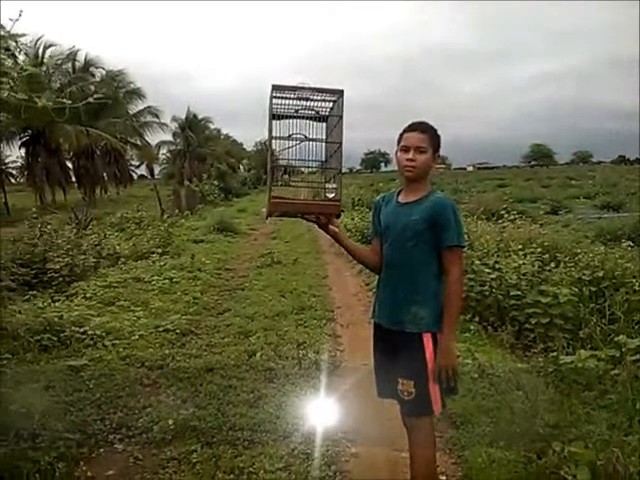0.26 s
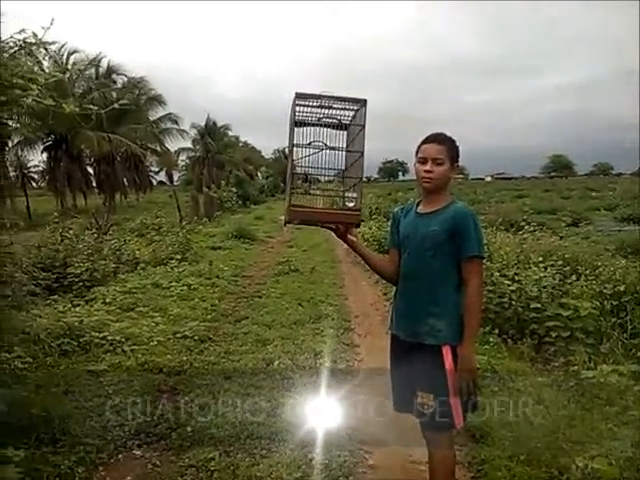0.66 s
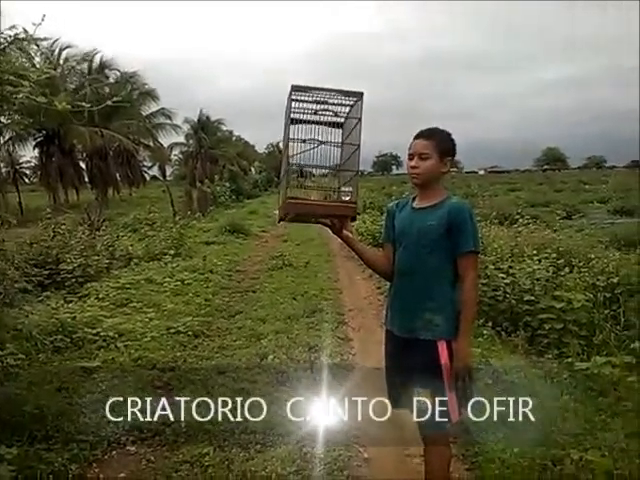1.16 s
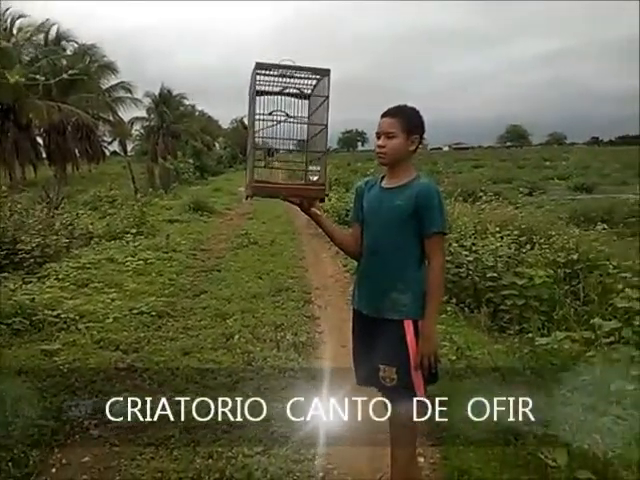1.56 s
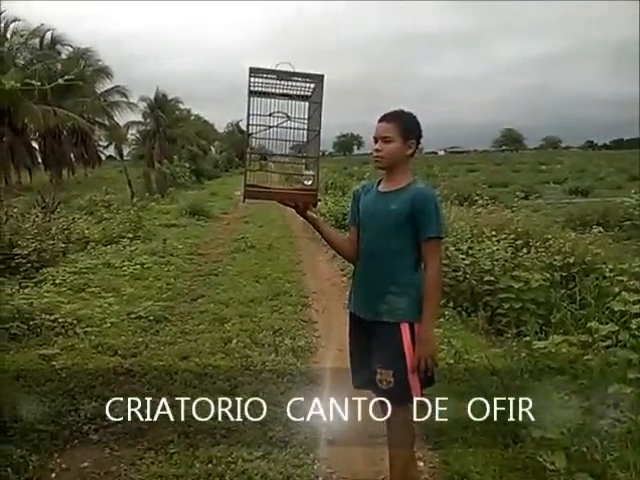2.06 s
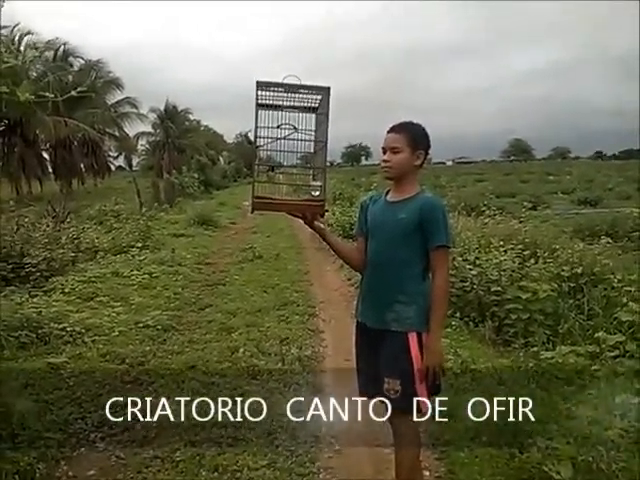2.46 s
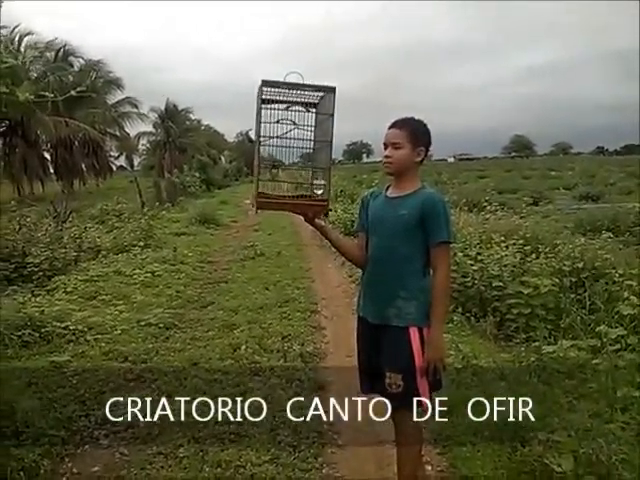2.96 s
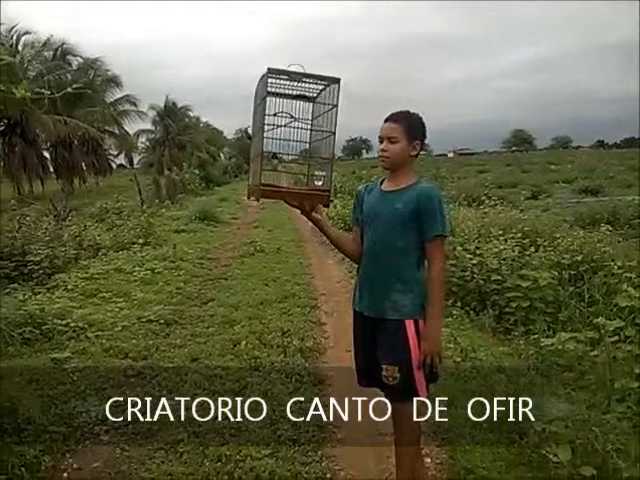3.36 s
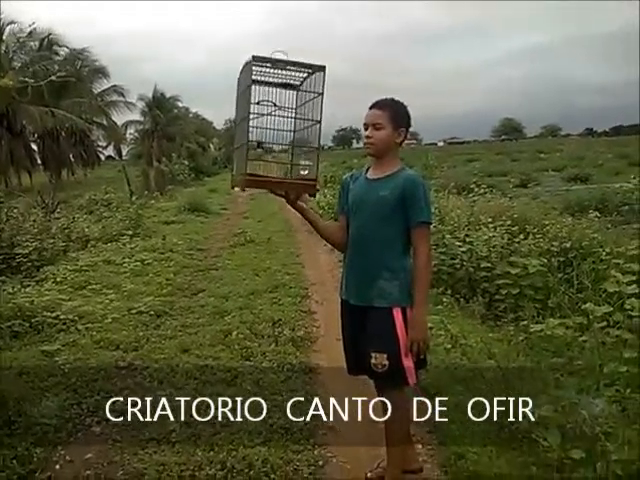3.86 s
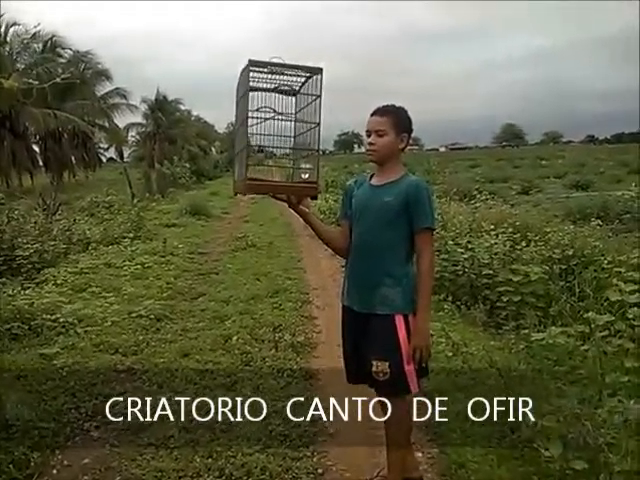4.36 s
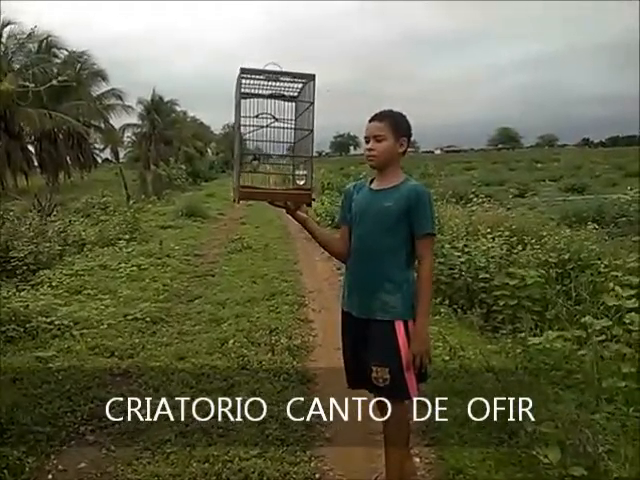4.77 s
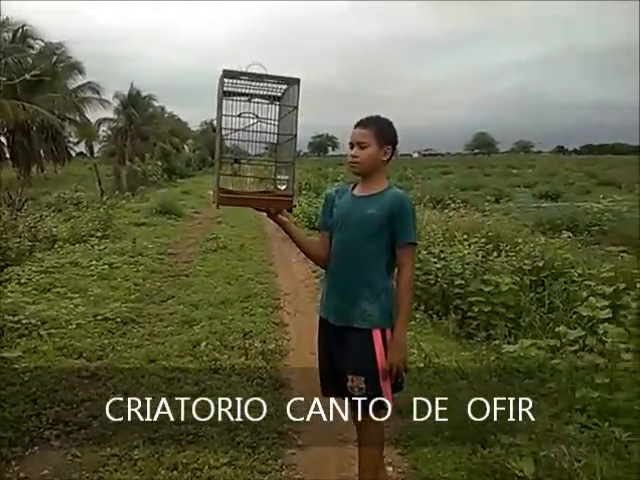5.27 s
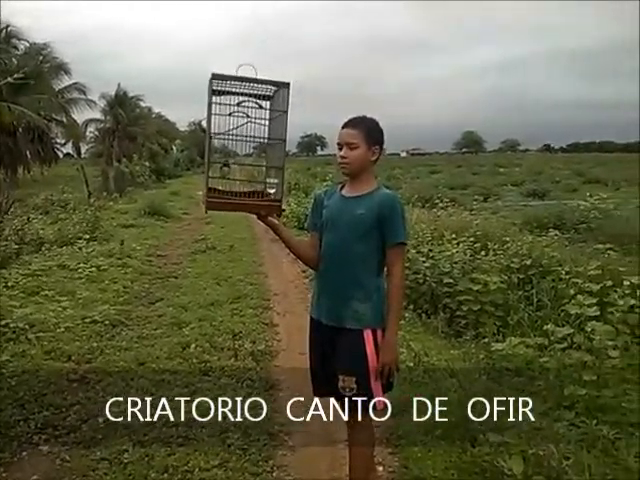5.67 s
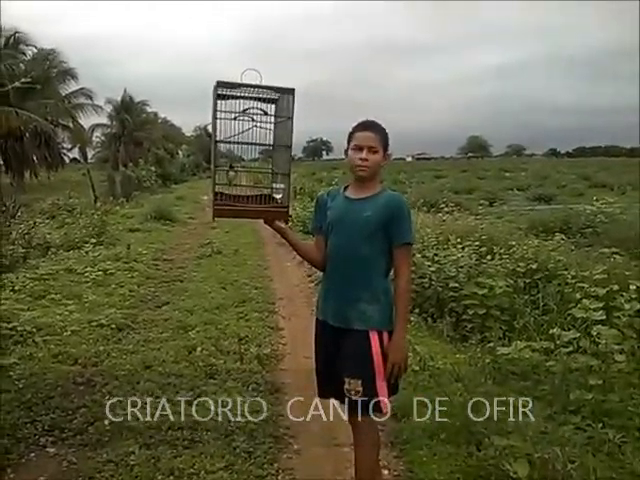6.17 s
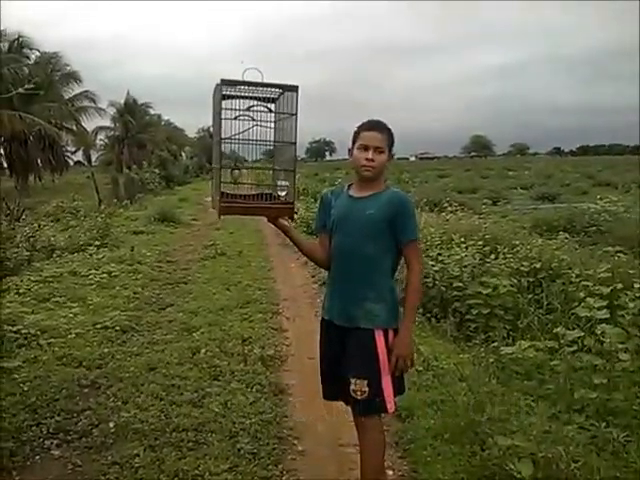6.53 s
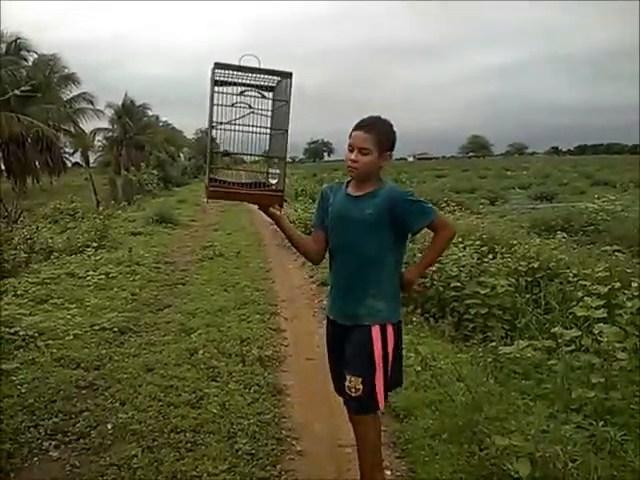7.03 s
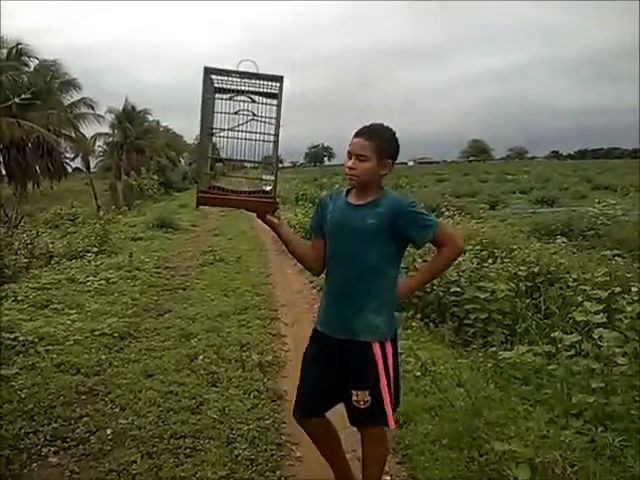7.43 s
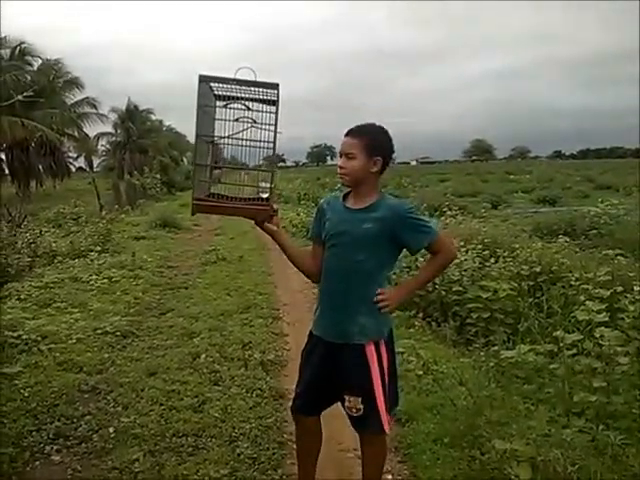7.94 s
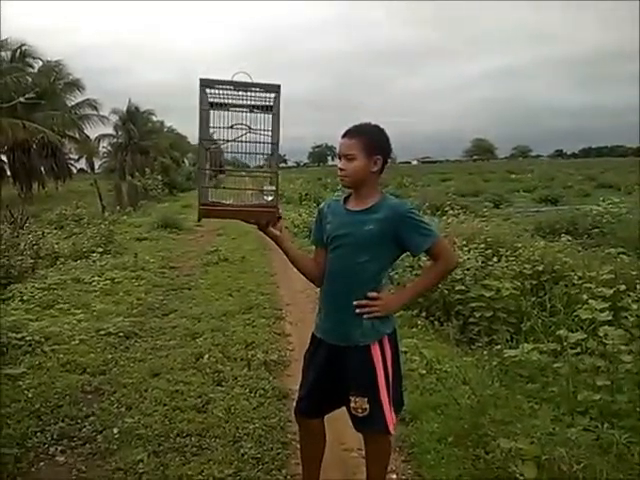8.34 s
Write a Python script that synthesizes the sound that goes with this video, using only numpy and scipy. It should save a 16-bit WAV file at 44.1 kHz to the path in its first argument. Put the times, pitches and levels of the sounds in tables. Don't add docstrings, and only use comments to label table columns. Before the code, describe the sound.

An open field with steady air hiss, a thin electronic whine, a faint low engine hum and high, rasping crickets; a katydid swishes softly during the first second. From 0.7 to 2.2 s a close caged bird whistles loudly: short falling slides, plunges, a scoop upward, then two steep high dives ending in hooks. A farther bird's buzzy chips quicken from 1.3 to 2.8 s. Insects then hold alone, with a few stray chirps. At 4.1-4.7 s the far bird gives six rough falling sweeps. Wind bumps and rumbles the microphone from about 4.7 to 6.6 s, and again around 7.5-8.4 s. At 6.8 s the near bird utters one short hoarse scold. Barely audible dove coos begin around 7 s. From 7.7 s distant trills slow and swell, and from 8 s the near song returns, diving and hooking down until about 9.5 s.

```python
import sys
import numpy as np
from scipy import signal
from scipy.fft import rfft, irfft, next_fast_len
from scipy.io import wavfile
from scipy.ndimage import map_coordinates

SR = 44100
rng = np.random.default_rng(int(sys.argv[2]) if len(sys.argv) > 2 else 0)


def volts(x):
    e = np.asarray(x, float) / 20
    return 10 ** e


def transcribe(u):
    v = np.clip(np.atleast_2d(u).T, -1, 1)
    q = np.round(v * 32767).astype(np.int16)
    wavfile.write(sys.argv[1], SR, q)


N = 418950
TIME = np.arange(N) / SR

# t from peak/s, pitch ratio, level/dB, shake depth/Hz
BUZZ_SHAPE = [(-.017, .9, -14, 500), (-.009, .93, -3, 800), (.005, 1.0, 0, 750), (.016, 1.11, -6, 350),
              (.032, 1.17, -13, 60)]
# t from peak/s, pitch ratio, level/dB, shake depth/Hz
DROP_SHAPE = [(-.02, 0.88, -29, 503), (-.008, 1.05, -9.5, 400), (.004, .98, -2, 200),
              (0.015, 0.88, -29, 100)]


def unit(x):
    return x / np.sqrt(np.mean(x ** 2) + 1e-20)


def wobble(rate_hz, size=N):
    knots = rng.standard_normal(int(size * rate_hz / SR) + 4)
    return map_coordinates(knots, [np.arange(size) * rate_hz / SR])


def noise(spectrum):
    hz = np.fft.rfftfreq(N, 1 / SR)
    f, db = np.transpose(spectrum)
    gain = volts(np.interp(np.log(hz + 1), np.log(f), db, -120, -120))
    return unit(irfft(rfft(rng.standard_normal(N)) * gain, N))


def track(rows, shake=np.zeros(N)):
    s, hz, db, *depth = np.transpose(rows)
    at = np.arange(max(round(s[0] * SR), 0), min(round(s[-1] * SR), N))
    t = at / SR
    edge = np.clip(np.minimum(t - s[0], s[-1] - t) / .003, 0, 1)
    swing_hz = shake[at] * (np.interp(t, s, depth[0]) if depth else 1)
    phase = 2 * np.pi * np.cumsum(np.interp(t, s, hz) + swing_hz) / SR
    level = np.sqrt(2) * edge * volts(np.interp(t, s, db))
    return at, phase + rng.uniform(0, 2 * np.pi), level


def syllables(events, shape, rate_hz, pitch_hz=None, stretch=0.):
    out = np.zeros(N)
    turn = 2 * np.pi * np.cumsum(rate_hz * (1 + 0.22 * wobble(60))) / SR
    shake = np.sin(turn) + 0.41 * wobble(500)
    for s, db, *own_hz in events:
        slow = 1 + stretch * (s - events[0][0]) ** 2
        hz = pitch_hz or own_hz[0]
        rows = [(s + dt * slow, hz * ratio ** slow ** .5, db + gain_db, depth_hz)
                for dt, ratio, gain_db, depth_hz in shape]
        at, phase, level = track(rows, shake)
        out[at] += level * np.sin(phase)
    return out


def strokes(rate_hz, duty, teeth):
    place = np.cumsum(rate_hz * (1 + 0.0039 * wobble(7.2))) / SR % 1
    swell = np.sin(np.pi * np.clip(place / duty, 0, 1)) ** 0.52
    return place, unit(swell * (1 + teeth * place * np.cos(8 * np.pi * place)))


def echoes(x, t60_s, wet_db, gap_s):
    t = np.arange(SR // 2) / SR
    tail = rng.standard_normal(len(t)) * volts(-60 * t / t60_s) * (t > gap_s)
    return x + volts(wet_db) * signal.fftconvolve(x, tail / np.linalg.norm(tail))[:N]


def bounced(x, db_per_octave):
    # delay/s, level at 2.5 kHz/dB
    bounces = [(.0031, -27), (.0075, -28.5), (.014, -31), (.022, -37), (.031, -41)]
    size = next_fast_len(N + SR // 10)
    hz = np.fft.rfftfreq(size, 1 / SR)
    copies = sum(volts(db) * np.exp(-2j * np.pi * hz * delay_s) for delay_s, db in bounces)
    tilt = volts(db_per_octave * (1.47 - abs(np.log2((hz + 1) / 7000))))
    return irfft(rfft(x, size) * (1 + copies * tilt), size)[:N]


def engine():
    # t/s, firing f/Hz, third-order level/dB
    running = [(0, 38.92, -66.5), (2.2, 39.16, -67.5), (5, 38.12, -57), (5.6, 35.24, -56),
               (6.5, 34.18, -55), (7.1, 31.8, -69.5), (7.999, 29.27, -62.5), (9, 37.55, -59)]
    s, hz, db = np.transpose(running)
    turn = 2 * np.pi * np.cumsum(np.interp(TIME, s, hz) * (1 + 0.0097 * wobble(26.0))) / SR
    orders = volts(-9.5) * np.sin(2 * turn) + np.sin(3 * turn) + volts(-3.0) * np.sin(4 * turn)
    return volts(2.5 + np.interp(TIME, s, db) + 2.1 * wobble(7.9)) * orders


def hiss():
    # f/Hz, level/dB per Hz
    air = [(35, -23.5), (60, -1), (129, -10.5), (369, -15), (2440, -17), (4160, -22.5), (5380, -15.5),
           (8370, -23.5), (15700, -22.5)]
    air_db, whine_hz, whine_db = -57, 15186, -80.5
    return volts(air_db) * noise(air) + volts(whine_db) * np.sin(2 * np.pi * whine_hz * TIME)


def wind():
    # f/Hz, level/dB per Hz
    rumble = [(15, -11), (28, -4.5), (60, -12.5), (150, -29), (400, -41.5)]
    # peak t/s, peak level/dB
    gusts = [(4.658, -40), (4.903, -38), (5.021, -34), (5.101, -44), (5.182, -32.5), (5.319, -27.5),
             (5.459, -31.5), (5.72, -35), (5.794, -34.5), (5.9, -31), (6.033, -36.5), (6.089, -36),
             (6.194, -35), (6.289, -30), (6.467, -31.5), (6.639, -38.5), (7.459, -38), (7.714, -34),
             (7.85, -26.5), (7.921, -39), (8.203, -30.5), (8.28, -33), (8.35, -39.5), (8.444, -34)]
    # peak t/s, peak level/dB, f/Hz
    snap = (5.861, -28.5, 63)
    calm_db, eddy_hz, eddy_cycles, puff_db = -57.5, 28, .75, -14
    buffet = unit(volts(2.24 * wobble(9.6)) * noise(rumble))
    out = volts(calm_db) * buffet
    chance = rng.uniform(-1.05, 1, (len(gusts), 2))
    eddies = [(s, db, eddy_hz * (1 + 0.2 * a), np.pi * b) for (s, db), (a, b) in zip(gusts, chance)]
    for s, db, hz, start in eddies + [(*snap, 0)]:
        cycles = (TIME - s) * hz
        push = np.sin(2 * np.pi * cycles + start) + volts(puff_db) * buffet
        out += volts(db) * np.exp(-(cycles / eddy_cycles) ** 2) * push
    return out


def near_cricket():
    # start t/s, end t/s, level/dB, warm-up/s, low tone f/Hz
    bouts = [(-.5, 0.122, -53.5, 0.091, 4820), (0.755, 2.563, -53, 0.15, 4796),
             (3.575, 5.141, -53.5, 0.15, 4800), (5.316, 5.53, -53.5, 0.035, 4770),
             (5.54, 5.915, -53, 0.0036, 4765), (6.705, 8.348, -52.5, 0.16, 4774)]
    strokes_hz, upper_hz, upper_db = 59.4, 4962, 1
    place = strokes(strokes_hz, duty=1, teeth=0)[0]
    early = unit(np.sin(np.pi * np.clip(place / 0.57, 0, 1)) ** 0.13)
    late = unit(np.sin(np.pi * np.clip((place - .36) / 0.49, 0, 1)) ** 0.13)
    out = np.zeros(N)
    for t0, t1, db, warm_s, low_hz in bouts:
        rows = [(t0, low_hz - 70, db - 14), (t0 + warm_s, low_hz, db), (t1, low_hz, db)]
        at, phase, level = track(rows, 60 * (.4 - place) + 14 * wobble(70))
        warmed = np.clip((TIME[at] - t0 - 1.6 * warm_s) / (0.28 * warm_s), 0, 1)
        lift = 2 * np.pi * place[at] * (upper_hz - low_hz) / strokes_hz
        low = (0.79 * late[at] + .5 * (1 - warmed)) * np.sin(phase)
        high = volts(upper_db) * warmed * early[at] * np.sin(phase + lift)
        out[at] += volts(1.9 * wobble(60.44, len(at))) * level * (low + high)
    return out


def katydid():
    first_s, every_s, half_s, rasp_db = 0.096, 0.128, 0.047, -56
    rasp = noise([(4300, -17), (4900, -9.0), (5700, -4.5), (6500, -13), (7200, -20)])
    rasp = rasp * strokes(70, duty=0.92, teeth=0)[1]
    swishes = sum(np.exp(-((TIME - first_s - k * every_s) / half_s) ** 4) for k in range(8))
    return volts(rasp_db) * rasp * swishes


def alarm_notes():
    # t/s, level/dB, f/Hz
    rises = [(.05, -69, 8400), (.442, -66, 8350), (.572, -67, 8350), (.69, -66, 8400), (0.806, -68, 8400),
             (7.062, -59, 5500)]
    rise_shape = [(-.022, .94, -1, 60), (-.006, .98, 6, 60), (.002, 1.03, 4, 40), (.008, 1.18, -4, 30)]
    # t/s, level/dB, f/Hz
    odd_drops = [(.875, -53, 7920), (3.95, -51, 6450), (4.045, -43, 6600), (6.35, -54, 7150),
                 (7.47, -53, 6600), (7.612, -46.5, 6670)]
    # t/s, level/dB, f/Hz
    odd_buzzes = [(3.915, -61, 7500), (4.02, -50, 7900), (7.58, -56, 7150), (9.212, -45.5, 8600)]
    # t/s, level/dB
    tsks = [(3.552, -49), (3.716, -45.5), (5.164, -46), (6.313, -47.5), (6.953, -50), (7.429, -48.5)]
    tsk_shape = [(-.03, 1.03, -14, 30), (-.012, 1.02, -6, 80), (-.002, 1.01, 0, 800), (.012, .96, -3, 1100),
                 (.022, .92, -12, 800)]
    out = syllables(rises, rise_shape, 150) + syllables(odd_drops, DROP_SHAPE, 300)
    return out + syllables(odd_buzzes, BUZZ_SHAPE, 260) + syllables(tsks, tsk_shape, 420, 8250)


def far_cricket():
    # t/s, f/Hz, level/dB
    phrase = [(0, 5430, -6), (.05, 5410, -1), (.22, 5350, -1), (.25, 5200, -4), (.31, 5310, 0),
              (.48, 5300, -5)]
    start_s, every_s, far_db = .3, .726, -60
    place, swell = strokes(55, duty=0.75, teeth=0.6)
    shake_hz = 120 * (.3 - place) + 100 * wobble(200)
    throb = volts(wobble(5) + 1.2 * wobble(50))
    out = np.zeros(N)
    for s in np.arange(start_s, N / SR, every_s):
        at, phase, level = track([(s + dt, hz, far_db + db) for dt, hz, db in phrase], shake_hz)
        out[at] += throb[at] * level * swell[at] * np.sin(phase)
    return out


def song():
    # start t/s, end t/s, rate/Hz, first depth/Hz, last depth/Hz
    warbles = [
        (.658, 0.74, 150, 483, 60.4),
        (1.404, 1.496, 150, 70, 240),
        (7.994, 8.106, 142, 626, 40),
        (8.75, 8.845, 160, 71, 201),
        (1.628, 1.658, 240, 130, 60),
        (9.15, 9.182, 170, 170, 60),
        (9.357, 9.393, 270, 420, 250),
    ]
    # t/s, f/Hz, level/dB
    openers = [
        [(.658, 3400, -49), (.674, 3440, -41), (.684, 3280, -31.5), (.698, 3530, -32), (.714, 3310, -31.5),
         (.726, 3240, -37), (.745, 3300, -38), (.76, 3160, -45)],
        [(7.994, 3520, -47), (8.012, 3320, -37.5), (8.024, 3540, -31.5), (8.038, 3310, -34),
         (8.048, 3220, -36.5), (8.07, 3170, -39), (8.088, 3120, -43), (8.097, 2970, -45)],
    ]
    # t/s, f/Hz, level/dB
    slides = [
        [(.73, 4000, -49), (.748, 4170, -49), (.76, 3990, -30.5), (.776, 3770, -29.5), (.786, 3650, -34.5),
         (.844, 3404, -24), (.866, 3296, -30), (.876, 3150, -50), (.884, 2850, -51)],
        [(8.06, 3770, -53), (8.074, 3960, -41), (8.1, 3820, -36), (8.11, 3640, -36), (8.161, 3352, -29.5),
         (8.189, 3305, -31), (8.213, 3275, -33), (8.222, 3190, -45), (8.228, 2890, -48)],
    ]
    # t/s, f/Hz, level/dB
    steps = [
        [(.952, 3900, -48), (.962, 3685, -32), (.98, 3860, -21), (.99, 3830, -26), (.997, 3550, -28.5),
         (1.014, 3385, -24.5), (1.035, 3350, -29.5), (1.047, 3410, -38), (1.055, 2820, -42)],
        [(8.303, 3720, -40), (8.315, 3924, -33), (8.325, 3820, -27.5), (8.337, 3860, -26.5),
         (8.345, 3550, -30.5), (8.361, 3394, -27.5), (8.38, 3370, -29.5), (8.392, 3340, -42),
         (8.399, 2900, -46)],
    ]
    # t/s, f/Hz, level/dB
    plunges = [
        [(1.033, 4880, -44), (1.048, 4550, -26), (1.058, 4410, -17), (1.068, 4190, -19.5), (1.076, 4220, -28),
         (1.09, 3940, -16.5), (1.104, 3846, -20), (1.138, 3820, -20), (1.15, 3610, -40)],
        [(8.378, 4730, -37), (8.395, 4560, -25), (8.409, 4220, -21), (8.416, 4360, -30), (8.423, 4080, -20),
         (8.44, 3870, -23.5), (8.455, 3805, -21.5), (8.483, 3777, -24.5), (8.496, 3280, -48)],
    ]
    # t/s, f/Hz, level/dB
    flats = [
        [(1.21, 3280, -41), (1.22, 3550, -36), (1.234, 3556, -26), (1.252, 3490, -26.5), (1.27, 3550, -35),
         (1.278, 3340, -45)],
        [(8.55, 3320, -38), (8.556, 3470, -40), (8.574, 3610, -29), (8.594, 3540, -32), (8.608, 3630, -39),
         (8.618, 3260, -49)],
    ]
    # t/s, f/Hz, level/dB
    high_plunges = [
        [(1.255, 4960, -44), (1.273, 4880, -28), (1.283, 4630, -25), (1.289, 4470, -22), (1.299, 4440, -13),
         (1.327, 4130, -20), (1.343, 4097, -20.5), (1.352, 3960, -33.5), (1.359, 3700, -35)],
        [(8.592, 5000, -39), (8.615, 4910, -34.5), (8.623, 4520, -20), (8.645, 4320, -19), (8.657, 4110, -33.5),
         (8.671, 4100, -18.5), (8.689, 4060, -20), (8.697, 3870, -36), (8.703, 3600, -41)],
    ]
    # t/s, f/Hz, level/dB
    scoops = [
        [(1.403, 3080, -47), (1.424, 2867, -24.5), (1.476, 2717, -28.5), (1.518, 3525, -19.5),
         (1.535, 3720, -29.5), (1.562, 4125, -14.5), (1.572, 4400, -35), (1.579, 4250, -23), (1.587, 3740, -45)],
        [(8.75, 3170, -40), (8.785, 2710, -26.5), (8.815, 2720, -26), (8.835, 2990, -28), (8.852, 3330, -23.5),
         (8.868, 3570, -25), (8.89, 3900, -21.5), (8.915, 4310, -23), (8.926, 4210, -26.5), (8.932, 3670, -45)],
    ]
    # t/s, f/Hz, level/dB
    climbs = [
        [(1.63, 2780, -44), (1.642, 2826, -28), (1.662, 2834, -25), (1.706, 3494, -20), (1.718, 3730, -31),
         (1.732, 3896, -14.5), (1.75, 4020, -17), (1.762, 4100, -17.5), (1.77, 4400, -50)],
        [(8.975, 2450, -42), (8.985, 2790, -36), (8.997, 2830, -27.5), (9.007, 2850, -35), (9.025, 3050, -24.5),
         (9.081, 3950, -23.5), (9.097, 4100, -23), (9.109, 4053, -22), (9.116, 4250, -37)],
        [(9.15, 2700, -38), (9.164, 2800, -35), (9.206, 3080, -22.5), (9.228, 3490, -31), (9.242, 3710, -20),
         (9.26, 4060, -24.5), (9.278, 4070, -19), (9.288, 4080, -42)],
    ]
    # t/s, f/Hz, level/dB
    dives = [
        [(1.826, 7880, -49), (1.846, 7240, -29), (1.864, 6740, -23.5), (1.872, 6520, -32), (1.884, 6130, -21.5),
         (1.892, 5970, -29), (1.9, 5560, -23.5), (1.91, 5500, -25), (1.92, 5600, -46)],
        [(2.046, 7990, -58), (2.066, 7370, -34), (2.088, 6790, -23.5), (2.095, 6550, -29), (2.102, 6300, -27),
         (2.11, 6050, -25.5), (2.12, 5650, -23), (2.13, 5500, -26), (2.14, 5700, -26)],
        [(9.342, 8200, -52), (9.358, 7500, -38), (9.364, 6950, -22.5), (9.378, 6900, -30), (9.392, 6600, -23.5),
         (9.408, 6100, -24), (9.416, 5850, -25.5), (9.426, 5520, -26), (9.44, 5500, -29)],
    ]
    # t/s, f/Hz, level/dB
    hooks = [
        [(1.9, 3930, -51), (1.906, 4050, -37), (1.92, 4160, -33.5), (1.928, 4430, -17.5), (1.935, 4870, -26)],
        [(2.122, 4064, -52), (2.128, 4130, -39), (2.142, 4070, -30.5), (2.154, 4620, -19), (2.158, 4760, -32)],
        [(9.418, 4100, -58), (9.43, 3900, -42), (9.446, 4420, -19), (9.453, 4700, -22)],
    ]
    # t/s, f/Hz, level/dB
    landings = [
        [(1.925, 3730, -47), (1.933, 3550, -38), (1.951, 3600, -24.5), (1.957, 3440, -23), (1.975, 2890, -27),
         (1.983, 2790, -55)],
        [(2.148, 3600, -48), (2.152, 3440, -46), (2.172, 3594, -21), (2.192, 3000, -24.5), (2.206, 2800, -30.5),
         (2.216, 2870, -47)],
        [(9.445, 3760, -45), (9.453, 3480, -39.5), (9.469, 3550, -21.5), (9.477, 3517, -27.5),
         (9.499, 3005, -19.5)],
    ]
    end_fall_s, end_fall_ratio, end_fade_db = 0.005, 0.85, 10
    shine_hz, shine_octaves = 12600, .3
    catch_s, catch_db = 0.095, -40.5

    swing_hz, out = np.zeros(N), np.zeros(N)
    for t0, t1, rate_hz, first_hz, last_hz in warbles:
        reach = np.clip(np.minimum(TIME - t0, t1 - TIME) / 0.0033, 0, 1)
        turn = 2 * np.pi * rate_hz * (TIME - t0) + 1.2 * wobble(33)
        depth_hz = first_hz * (last_hz / first_hz) ** np.clip((TIME - t0) / (t1 - t0), 0, 1)
        saw = np.sin(turn) + .3 * np.sin(2 * turn)
        swing_hz += depth_hz * reach * volts(1.5 * wobble(110)) * saw
    swing_hz += 12 * wobble(150)
    flutter = volts(1.24 * wobble(90)) * (1 + np.clip(swing_hz / 800, -.9, .9))

    snapped = []
    for note in flats + climbs:
        s, hz, db = note[-1]
        snapped.append(note + [(s + end_fall_s, hz * end_fall_ratio, db - end_fade_db)])
    notes = openers + slides + steps + plunges + high_plunges + scoops
    for note in notes + snapped + dives + hooks + landings:
        at, phase, level = track(note, swing_hz)
        pitch_hz = np.gradient(phase) * SR / (2 * np.pi)

        def shine(k):
            octaves = np.log2(abs(k * pitch_hz / shine_hz) + 1e-9)
            return np.exp(-(octaves / shine_octaves) ** 2)

        second = volts(-30) * shine(2) ** 2
        third = volts(-30) * np.sqrt(level) * shine(3)
        tone = np.sin(phase) + second * np.sin(2 * phase) + third * np.sin(3 * phase)
        out[at] += level * flutter[at] * tone

    breath = noise([(3500, -20), (5000, 8.0), (7000, -8), (9000, -13), (15700, -14)])
    catches = sum(np.exp(-((TIME - dive[0][0] - catch_s) / 0.023) ** 2) for dive in dives)
    return out + volts(catch_db) * breath * catches


def paired_cricket():
    # t/s, level/dB
    pairs = [(.741, -46.5), (1.206, -44.5), (1.8, -53), (2.635, -47), (3.096, -46), (4.394, -54),
             (4.89, -47), (5.29, -47), (5.767, -51), (6.193, -49.5), (6.666, -52), (7.163, -50),
             (7.776, -51), (8.201, -52), (8.758, -52), (9.196, -53)]
    shape = [(-.014, 1.03, -10, 30), (-.003, 1.005, 0, 30), (.012, .97, -8, 30)]
    chirps = [(s + lag_s, db + gain_db) for s, db in pairs for lag_s, gain_db in [(0, 0.48), (-.047, -3.2)]]
    return syllables(chirps, shape, 250, 5775)


def trills():
    # t/s, level/dB
    opens = [(1.293, -65), (1.375, -56), (1.456, -58), (1.54, -56), (1.616, -53), (1.692, -52),
             (1.766, -49), (1.842, -41), (1.913, -42), (1.985, -45.5), (2.06, -47)]
    # t/s, level/dB, f/Hz
    turns = [(2.124, -46, 9940), (2.189, -54, 9760), (2.255, -52, 9800), (2.32, -53.5, 8870),
             (2.388, -52.5, 9060), (2.455, -52, 8735)]
    # t/s, level/dB
    ticks = [(2.516, -55), (2.577, -54.5), (2.635, -52), (2.691, -53), (2.746, -50), (2.801, -50.5)]
    # t/s, level/dB
    slows = [(7.705, -49.5), (7.778, -57), (7.864, -52), (7.942, -57), (8.024, -47.5), (8.102, -40.5),
             (8.181, -38.5), (8.266, -40.5), (8.357, -37), (8.444, -35.5), (8.534, -37), (8.627, -35),
             (8.733, -39), (8.837, -36.5), (8.955, -37), (9.078, -36.5), (9.221, -80)]
    # t/s, level/dB, f/Hz
    squeak = (9.226, -58, 12400)
    # t from peak/s, pitch ratio, level/dB, shake depth/Hz
    chip_shape = [(-.007, 1.15, -9, 80), (-.002, .99, 0, 60), (.003, .97, -2, 200), (.008, 1.05, -11, 1000),
                  (.017, 1.1, -18, 1000)]
    # t from peak/s, pitch ratio, level/dB, shake depth/Hz
    tick_shape = [(-.012, .95, -15, 300), (0, 1.003, 4.5, 400), (.01, 1.07, -21, 400)]
    # t from peak/s, pitch ratio, level/dB, shake depth/Hz
    slow_shape = [(-.016, .88, -14, 450), (-.007, .95, -2, 800), (.004, 1.02, 0, 700),
                  (.014, 1.11, -6, 400), (.032, 1.25, -13, 150)]
    high_hz = 8790
    buzz_lead_s, drop_lead_s, slow_lead_s = 0.028, 0.019, .027
    opening_db, opening_db_per_s = -52, 4
    drop_db, drop_db_per_s = -43.5, -11
    slow_db, slow_db_per_s, slow_top_db = -50.5, 11, -40
    stretch_per_s2, chip_rise_power = 0.23, 0.3

    out = syllables(opens, chip_shape, 400, high_hz)
    buzzes = [(s - buzz_lead_s, opening_db + opening_db_per_s * (s - opens[0][0])) for s, _ in opens]
    out += syllables(buzzes, BUZZ_SHAPE, 350, 6700)
    out += syllables(turns, chip_shape, 400)
    out += syllables(ticks, tick_shape, 400, 10100)
    ends = [row[0] for row in turns[1:] + ticks]
    drops = [(s - drop_lead_s, drop_db + drop_db_per_s * (s - ends[0])) for s in ends]
    out += syllables(drops, DROP_SHAPE, 300, 6600)

    s, high_db = np.transpose(slows)
    slow = 1 + stretch_per_s2 * (s - s[0]) ** 2
    out += syllables(list(zip(s, high_db, high_hz * slow ** chip_rise_power)), chip_shape, 370)
    low_db = np.minimum(slow_db + slow_db_per_s * (s - s[0]), slow_top_db)
    lows = list(zip(s - slow_lead_s * slow ** 1.4, low_db))
    out += syllables(lows, slow_shape, 260, 6530, stretch=stretch_per_s2)
    return out + syllables([squeak], tick_shape, 400)


def stray_whistles():
    # t/s, f/Hz, level/dB
    strays = [
        [(3.27, 3010, -58), (3.295, 3320, -62), (3.325, 4080, -65)],
        [(5.82, 4460, -61), (5.843, 4250, -54), (5.884, 3980, -66)],
        [(6.124, 4100, -63), (6.133, 5500, -58)],
        [(6.361, 5220, -50), (6.386, 3700, -71)],
    ]
    out = np.zeros(N)
    for note in strays:
        at, phase, level = track(note)
        out[at] += level * np.sin(phase)
    return out


def sweeps():
    # t/s, level/dB
    falls = [(4.125, -41.5), (4.227, -42.5), (4.33, -39.5), (4.435, -39), (4.54, -39.5), (4.657, -37.5)]
    # t from peak/s, pitch ratio, level/dB, shake depth/Hz
    main = [(-.006, 1.24, -10, 30), (.002, 1.04, 0, 40), (.016, .8, -5, 80), (.04, .8, -19, 700)]
    # t from peak/s, pitch ratio, level/dB, shake depth/Hz
    lead = [(-.028, 1.02, -15, 600), (-.018, 1.08, -7, 800), (-.006, 1.23, -11, 150)]
    # t from peak/s, pitch ratio, level/dB, shake depth/Hz
    top = [(.004, 1.85, -22, 50), (.013, 1.43, -7, 700), (.022, 1.47, -12, 900), (.036, 1.52, -22, 600)]
    return sum(syllables(falls, part, 290, 6330) for part in (main, lead, top))


def scold():
    # t/s, first side f/Hz, second side f/Hz, level/dB
    sides = [(6.776, 3920, 2640, -53), (6.789, 3060, 2520, -54), (6.798, 2990, 2520, -46),
             (6.818, 3030, 2310, -44.5), (6.832, 2920, 2140, -43), (6.851, 2490, 2176, -49.5),
             (6.87, 2230, 2090, -58)]
    side_tones = [(1, 0, 0), (0, 1, -4), (2, 0, 7), (0, 2, 9), (0, 3, 4)]
    out = np.zeros(N)
    at, first, level = track([(s, hz, db) for s, hz, _, db in sides], 45 * wobble(250))
    second = track([(s, hz, db) for s, _, hz, db in sides], 45 * wobble(250))[1]
    hoarse = np.linspace(0, 1, len(at)) ** 2
    for j, k, db in side_tones:
        gain = volts(db + 1.5 - 6 * hoarse + 2.5 * wobble(150, len(at)))
        out[at] += level * gain * np.sin(j * first + k * second)
    rasp = noise([(2000, -17), (3500, -17.5), (4600, 1.5), (8000, -10.5), (12000, -23),
                  (14800, -17), (15700, -20)])
    out[at] += level * volts(-1 + 8 * hoarse) * rasp[at]
    return out


def dove():
    # t/s, level/dB, f/Hz
    coos = [(6.95, -75.5, 666), (7.66, -77, 640), (8.32, -75.5, 643), (8.98, -75, 633)]
    coo_shape = [(-.12, .95, -2, 3), (0, 1.01, 0, 3), (.09, .99, -4, 3)]
    return syllables(coos, coo_shape, 20)


def scene():
    insects = near_cricket() + katydid() + far_cricket() + paired_cricket()
    far_birds = alarm_notes() + trills() + stray_whistles() + sweeps() + dove()
    near = echoes(bounced(song(), db_per_octave=14.5) + scold(), t60_s=0.18, wet_db=-25.5, gap_s=0.0099)
    far = volts(1.5) * echoes(far_birds, t60_s=0.097, wet_db=-4.5, gap_s=0.0012)
    grass = echoes(insects, t60_s=.1, wet_db=-12, gap_s=.003)
    mono = near + far + grass + engine() + hiss() + wind()
    return np.array([mono, mono])


def band_limit(x):
    return signal.sosfilt(signal.butter(12, 16400, fs=SR, output="sos"), x)


def record(dry):
    top_hz = 15720
    kept = irfft(rfft(dry) * (np.fft.rfftfreq(N, 1 / SR) < top_hz), N)
    return band_limit(kept)


dry = scene()
out = record(dry)
transcribe(out)
```